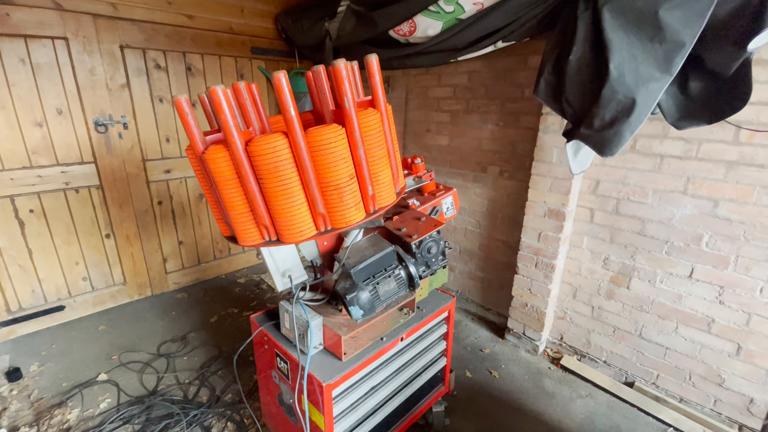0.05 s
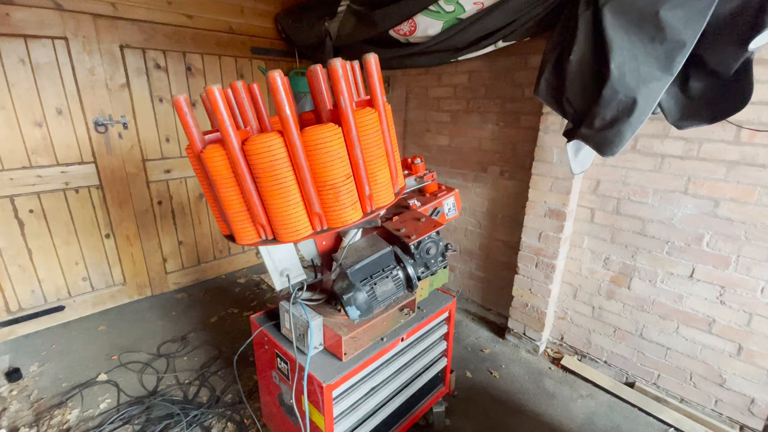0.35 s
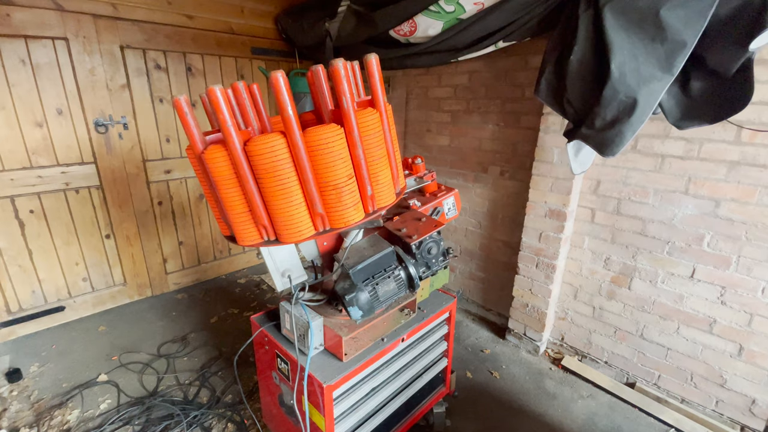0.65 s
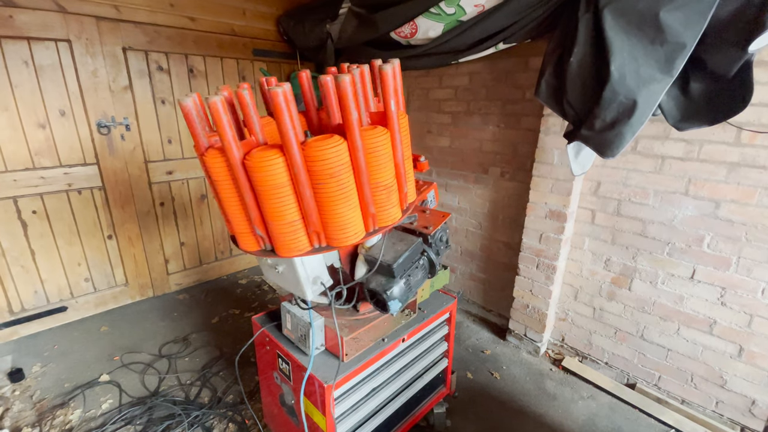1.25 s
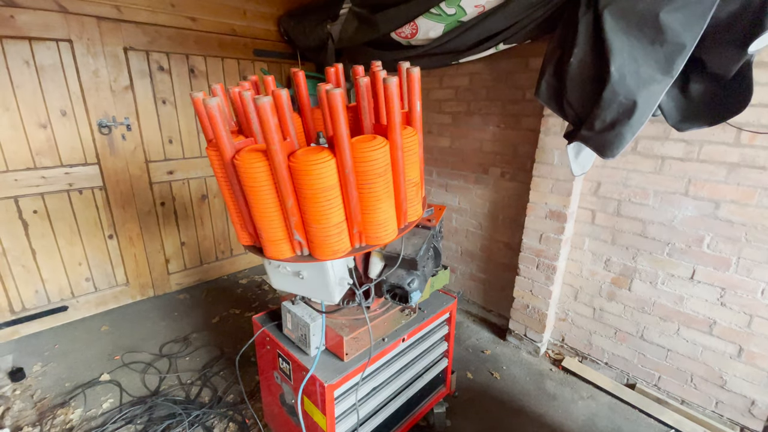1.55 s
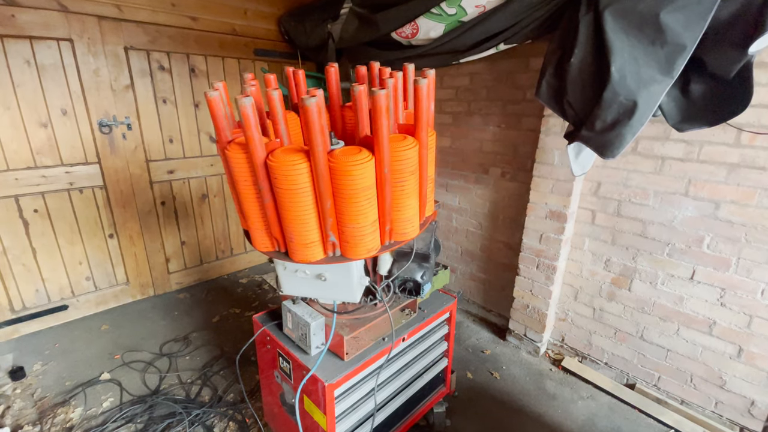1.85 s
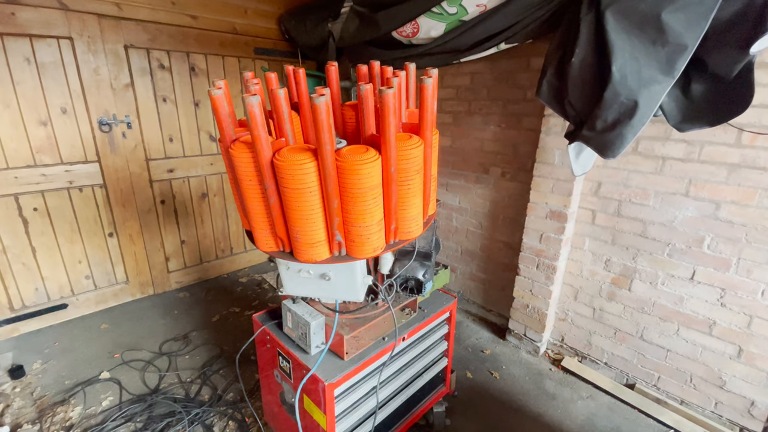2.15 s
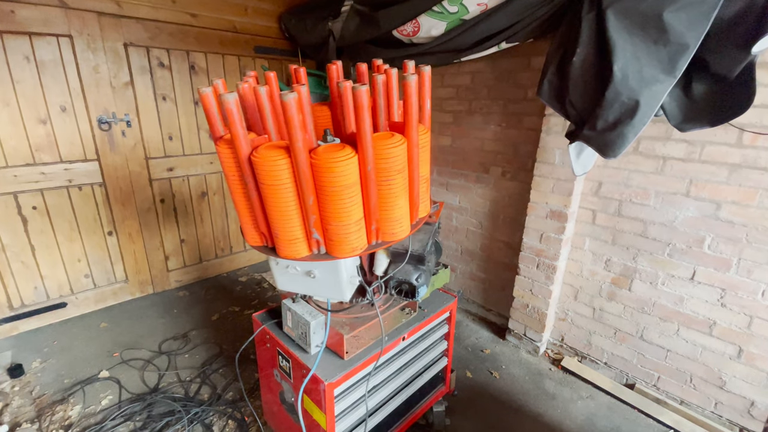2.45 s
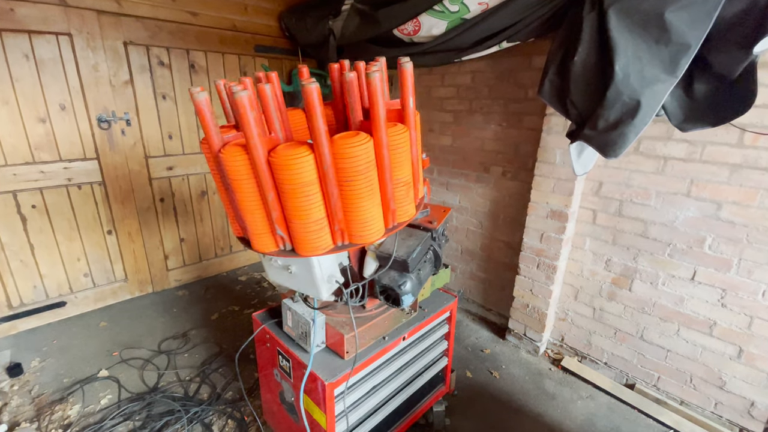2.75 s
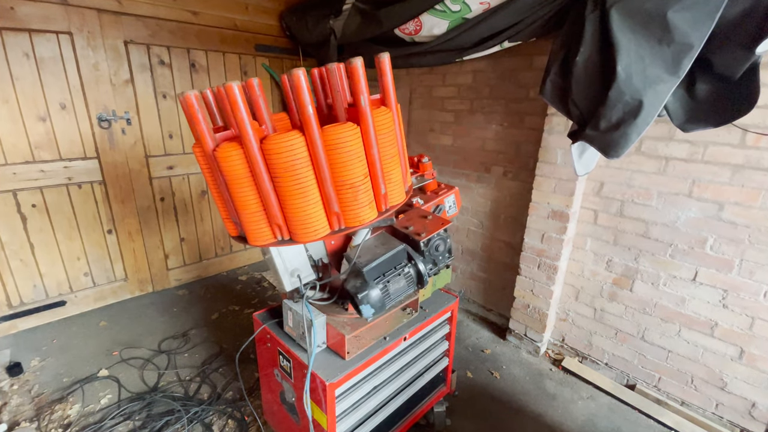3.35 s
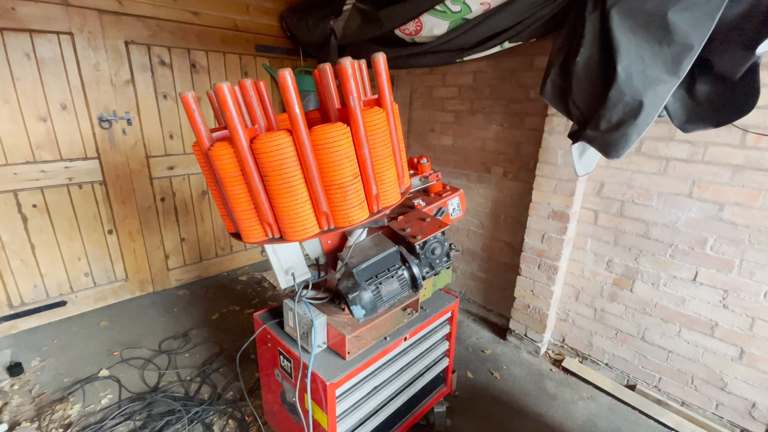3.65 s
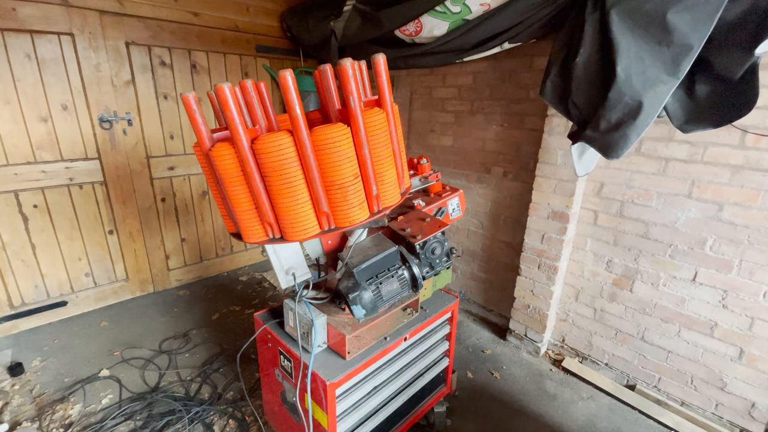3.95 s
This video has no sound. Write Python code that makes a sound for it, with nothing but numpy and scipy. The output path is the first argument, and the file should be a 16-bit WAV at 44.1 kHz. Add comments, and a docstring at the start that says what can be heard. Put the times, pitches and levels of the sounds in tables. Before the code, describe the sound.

A clay target machine starts with steel clatter at about 0.3 seconds, its motor humming and gears whirring, and gives its loudest clunk near 0.65. It whirrs more quietly, rubbing lightly around 2 seconds, then clatters and scrapes from 2.3 to 2.7. A faintly squeaky scrape follows after 3, with sharp clunks near 3.7 and 4. A low rumble lies underneath, and the small shed adds short echoes.

```python
"""Clay target machine in a shed

A clay target machine swivels and cycles in a small brick and timber shed, over a low rumble.
Its motor hums at twice the mains frequency over a whirr of gears. Sliding parts scrape, rub
and faintly squeak; the steel frame clunks and clatters as the drive takes up and reverses.
The shed's short echoes shift as the head swings out and back."""
import sys
import numpy as np
from scipy import signal
from scipy.fft import rfft, irfft
from scipy.io import wavfile

SR = 44100
rng = np.random.default_rng(int(sys.argv[2]) if len(sys.argv) > 2 else 0)


def unload_audio(sound):
    """Save the sound as a 16-bit wav file, at the path given as the first command line argument."""
    columns = np.transpose(np.atleast_2d(sound))
    # keep every value between -1 and 1, then stretch to whole-number steps
    steps = np.round(np.clip(columns, -1, 1) * 32767)
    wavfile.write(sys.argv[1], SR, steps.astype(np.int16))


N = 176400
TIME = np.arange(N) / SR

# tone of the background rumble: (frequency [Hz], relative level [dB])
RUMBLE_SPECTRUM = [(22, -74), (35, -20), (50, 5), (66, 18), (85, 8.5), (130, 3), (200, -46), (400, -92)]
# the shed's reverb tail: (frequency [Hz], time to fall 60 dB [s])
SHED_DECAY = [(150, 0.35), (1000, 0.26), (4000, 0.28), (11000, 0.15)]
# stereo tilt of the whole mix: (frequency [Hz], left minus right [dB])
LEFT_TILT = [(100, 0.5), (200, -6.5), (350, 3), (700, 2), (1200, 4.5), (2100, 1), (3800, 7), (6500, 6.5),
             (8500, 5.5), (11000, -2.5)]
# envelope of the motor hum: (time [s], level [dB])
HUM_ENVELOPE = [(0, -80), (.28, -51.5), (.39, -37.5), (.445, -26.5), (.6, -31.5), (.7, -31), (.79, -39),
                (.87, -31.5), (1.27, -32.5), (1.52, -39.5), (2.17, -39), (2.3, -29), (2.38, -41.5),
                (2.46, -28), (2.53, -27), (2.59, -39), (2.65, -30.5), (2.76, -30), (2.89, -38.5),
                (3.0, -29), (3.3, -32), (3.71, -31.5), (3.92, -28.5), (4, -34)]
# buzz of the motor housing: (harmonic of the hum [number], relative level [dB])
BUZZ_HARMONICS = [(2, -2.5), (3, -4.5), (5, -9), (6, -8.5), (7, -5), (8, -7.5), (9, -5), (10, -22),
                  (11, -2), (12, -15.5)]
# load on the drive: (time [s], buzz level [dB], gear whirr level [dB])
DRIVE_LOAD = [(0, -60.5, -50), (.22, -57, -50.5), (.4, -47.5, -38.5), (.8, -62.5, -41), (1.1, -51.5, -42),
              (1.6, -66, -42), (1.8, -49, -42), (2.2, -48.5, -43), (2.6, -49.5, -39), (2.9, -49, -39.5),
              (3.25, -42, -44), (3.6, -42.5, -41), (4, -56, -38)]
# tone of the gearbox: (frequency [Hz], relative level [dB])
GEAR_SPECTRUM = [(100, -4), (200, -4), (280, 1.5), (420, -7.5), (700, -4.5), (1050, -2.5), (1550, -12.5),
                 (2000, -13.5), (2900, -24), (4500, -31.5), (9000, -37), (13000, -67)]
# tone of the turntable's rub: (frequency [Hz], relative level [dB])
TURNTABLE_SPECTRUM = [(500, -3), (1500, -1.5), (2200, 3), (2850, 1.5), (4000, -16.5), (4900, -10),
                      (5700, -17.5), (9000, -19), (11500, -12.5), (12800, -59)]
# faint singing of sliding parts: (time [s], hold [s], pitch [Hz], level [dB])
SQUEAK_CUES = [(1.362, 0.084, 2000, -55), (1.792, 0.26, 2200, -54), (1.764, 0.61, 2750, -53.5),
               (2.376, 0.043, 1722, -40), (2.437, 0.023, 2061, -39.5), (2.434, 0.027, 3160, -46),
               (3.054, 0.38, 2420, -49), (3.065, 0.41, 2918, -52), (3.2, 0.06, 865, -48)]
# parts sliding on each other:
# (time of full pressure [s], rise [s], hold [s], fall [s], body level [dB], hiss level [dB])
SCRAPE_CUES = [(0.498, 0.017, 0.012, 0.015, -57, -47), (0.825, 0.0064, 0.024, 0.0078, -36.5, -48),
               (2.284, 0.014, 0.022, 0.022, -36, -49.5), (2.422, 0.065, 0.028, 0.035, -35.5, -42),
               (2.571, 0.0078, 0.021, 0.03, -36.5, -50), (2.685, 0.0057, 0.082, 0.018, -42.5, -50.5),
               (3.067, 0.057, 0.48, 0.023, -45, -47), (3.196, 0.088, 0.051, 0.067, -34.5, -49.5),
               (3.836, 0.0088, 0.013, 0.024, -45.5, -45.5)]
# midrange body of a scrape: (frequency [Hz], relative level [dB])
SCRAPE_BODY_SPECTRUM = [(200, -13), (320, 2), (500, -4.5), (800, 3.5), (1100, -1.5), (1500, -5.5),
                        (2000, -3), (2800, -21), (4000, -17.5), (8000, -60)]
# bright hiss of a scrape: (frequency [Hz], relative level [dB])
SCRAPE_HISS_SPECTRUM = [(1000, -14), (2000, 1.5), (2700, 13.5), (3800, 2), (4800, 7), (7500, 4.5),
                        (9200, 0.5), (11700, -7.5), (13300, -53)]
# blows on the frame: (time [s], thud [dB], clang [dB], tick [dB], pitch of the part struck [Hz])
KNOCK_CUES = [(0.2359, -40, -26.5, -34, 1266), (0.327, -33, -25, -44.5, 1160),
              (0.344, -25.5, -29, -45, 2070), (0.3544, -24.5, -19.5, -28.5, 1480),
              (0.372, -30, -30, -39, 1293), (.394, -35, -31, -47, 1610), (0.618, -43, -29.5, -65, 1232),
              (0.6238, -55, -71, -37.5, 1900), (.647, -22.5, -12.5, -29.5, 1147), (.66, -27, -24, -31, 990),
              (0.675, -30, -29, -28, 970), (0.693, -20.5, -42, -36, 870), (0.852, -42, -31, -82, 965),
              (0.9157, -62, -88, -37.5, 1900), (2.299, -31.5, -34, -38.5, 960), (2.325, -44, -37, -44, 899),
              (2.3492, -45, -30.5, -30, 960), (2.38, -35, -30, -30.5, 1780), (2.412, -33, -30, -39, 620),
              (2.434, -30, -29.5, -40, 1190), (2.458, -27.5, -33, -48, 299), (2.581, -42, -34, -62, 1065),
              (2.646, -51, -66, -34.5, 1900), (2.663, -34, -33, -40, 890), (2.707, -43, -62, -38, 1940),
              (3.6425, -45, -25, -48, 1180), (3.66, -25.5, -30, -50, 296),
              (3.6754, -29.5, -25.5, -30, 1430), (3.69, -19.5, -30.5, -39, 1750),
              (3.746, -30, -58, -72, 279), (3.969, -38, -15.5, -28, 1267), (3.981, -22, -24.5, -35, 930)]
# modes of the steel frame: (frequency [Hz], relative level [dB], time to fall 60 dB [s])
FRAME_MODES = [(293, 4, 0.067), (580, -3.5, 0.049), (674, -1.5, 0.054), (803, -1, 0.028),
               (866, -7.5, 0.076), (1113, 0.5, 0.038), (1343, -6, 0.036), (1407, -1.5, 0.039),
               (1871, -3.5, 0.056), (7340, -1, 0.039)]
# the dense, short-lived rest of the frame's ring: (frequency [Hz], relative level [dB])
CRACK_SPECTRUM = [(60, -26), (190, -3), (290, 11), (430, -4), (800, 4), (1300, -3), (1900, 0), (3000, -1.5),
                  (4000, -9.5), (7000, -9), (9500, -8.5), (11500, -11.5), (14000, -43)]

RUMBLE_DB, RUMBLE_FADE_DB_PER_S, RUMBLE_WIDTH = -45.5, .8, .3
SHED_BUILD_S, MONO_BELOW_HZ = .00044, 385
SWIVEL_START_S, SWIVEL_END_S = 1.0, 3.2
DRIVE_WET_DB, DRIVE_LEAD_S = 6.5, .00046
KNOCK_WET_DB, KNOCK_LEAD_S = .5, .00018
HUM_HZ, HUM_WOBBLE_HZ, HUM_FLUTTER_DB = 100.1, .478, 1.1
GEAR_GRAIN_DB, GEAR_FLUTTER_DB = 5, 1.5
RUB_START_S, RUB_END_S, RUB_RISE_S, RUB_FALL_S, RUB_DB = 1.75, 2.3, .059, .03, -49.5
SQUEAK_WIDTH_HZ, SQUEAK_RISE_S, SQUEAK_FALL_S = 80, .023, .0078
FINE_GRAIN_DB, COARSE_GRAIN_DB = 4, 5.5
THUD_HZ, CLANG_HZ, TICK_HZ, KNOCK_ATTACK_S = 261, 1060, 7560, .00034
RING_DB, RING_SPREAD_DB, RING_DETUNE, RING_BUILD_S = -1.5, 1.0, .016, .0018
CRACK_DB, CRACK_T60_S = 4.5, .05
SNAP_DB, SNAP_T60_S, SNAP_ABOVE_HZ = 6.5, .0074, 4200   # the bright instant of contact
PART_DB, PART_T60_S = 5.5, .034   # the ring of the part struck
LOW_CUT_HZ, HIGH_CUT_HZ = 42, 15700


def amp(db):
    """Decibels to gain."""
    return 10 ** (np.asarray(db) / 20)


def unit(x):
    """Scale to rms 1."""
    return x / np.sqrt(np.mean(x ** 2) + 1e-20)


def at_hz(points, hz):
    """Read a curve on a log-frequency axis."""
    freqs, values = np.transpose(points)
    return np.interp(np.log(np.maximum(hz, 1)), np.log(freqs), values)


def envelopes(rows):
    """One envelope for each level column of a timed table."""
    times, *columns = np.transpose(rows)
    return [np.interp(TIME, times, column) for column in columns]


def bins(n):
    """Frequencies of an n-point spectrum."""
    return np.arange(n // 2 + 1) * SR / n


def equalise(x, spectrum):
    """Apply an EQ curve."""
    n = x.shape[-1]
    return irfft(rfft(x) * amp(at_hz(spectrum, bins(n))), n)


def colour(x, spectrum):
    """EQ a steady signal and bring it to rms 1."""
    return unit(equalise(x, spectrum))


def drift(rate_hz):
    """Smooth random modulation, rms 1."""
    return unit(irfft(rfft(rng.standard_normal(N)) / (1 + (bins(N) / rate_hz) ** 2), N))


def grains(spread_db):
    """Grit: dense tiny contacts of uneven size."""
    size = amp(spread_db * np.minimum(rng.exponential(1, N), 5))
    return size * rng.choice([-1, 1], N) * (rng.random(N) < .1)


def stroke(time, rise, hold, fall):
    """Envelope that swells to full at the given time, holds and dies away."""
    early, late = np.maximum(time - TIME, 0), np.maximum(TIME - time - hold, 0)
    return np.exp(-(early / rise) ** 2 - late / fall)


def chatter(depth):
    """Tremolo of a contact shaken by the motor's hum."""
    return 1 + depth * np.sin(2 * np.pi * HUM_HZ * TIME)


def rumble():
    """A low bed of noise, nearly mono, slowly fading."""
    air = rng.standard_normal(N) + RUMBLE_WIDTH * rng.standard_normal((2, N))
    return amp(RUMBLE_DB - RUMBLE_FADE_DB_PER_S * TIME) * colour(air, RUMBLE_SPECTRUM)


def shed_response():
    """Diffuse echoes die band by band, near mono in the bass and wide above; unit energy."""
    n = SR // 2
    t, freqs, tail = TIME[:n], bins(n), 0
    mono, wide = rfft(rng.standard_normal(n)), rfft(rng.standard_normal((2, n)))
    mono_share = 1 / (1 + (freqs / MONO_BELOW_HZ) ** 2)
    field = np.sqrt(mono_share) * mono + np.sqrt(1 - mono_share) * wide
    centres = np.geomspace(100, 12800, 8)
    for hz, weights in zip(centres, np.eye(len(centres))):
        band = irfft(field * at_hz(np.c_[centres, weights], freqs), n)
        tail = tail + band * amp(-60 * t / at_hz(SHED_DECAY, hz))
    return unit(tail * (1 - np.exp(-t / SHED_BUILD_S))) / np.sqrt(n)


def shed_echoes(x, responses):
    """The head swings out and back, crossfading between two patterns of echoes."""
    swing = np.interp(TIME, [SWIVEL_START_S, SWIVEL_END_S], [0, np.pi])
    crossfade = np.pi / 2 * np.sin(swing) ** 2
    home, turned = (signal.fftconvolve(x[None], response, axes=1)[:, :N] for response in responses)
    return np.cos(crossfade) * home + np.sin(crossfade) * turned


def in_shed(x, responses, wet_db, lead_s):
    """Direct sound, reaching the left ear first, in an equal-power blend with the echoes."""
    direct = np.array([x, np.interp(TIME - lead_s, TIME, x)])
    return (direct + amp(wet_db) * shed_echoes(x, responses)) / np.sqrt(1 + amp(wet_db) ** 2)


def motor(buzz_db):
    """Magnetic hum under the flickering overtones of the housing."""
    phase = 2 * np.pi * np.cumsum(HUM_HZ + HUM_WOBBLE_HZ * drift(5.56)) / SR
    phase = phase - np.array([[0], [2 * np.pi * HUM_HZ * DRIVE_LEAD_S]])   # the right ear lags
    hum_db, = envelopes(HUM_ENVELOPE)
    out = amp(hum_db + HUM_FLUTTER_DB * drift(6.4)) * np.sin(phase)
    for harmonic, db in BUZZ_HARMONICS:
        start_phase = rng.uniform(0, 2 * np.pi)
        gain = amp(buzz_db + db + 1.8 * drift(14))
        out = out + gain * np.sin(harmonic * phase + start_phase + .11 * drift(4.7))
    return np.sqrt(2) * out


def gears(whirr_db):
    """Teeth and bearings patter into the gearbox and blur to a whirr."""
    return amp(whirr_db + GEAR_FLUTTER_DB * drift(42)) * colour(grains(GEAR_GRAIN_DB), GEAR_SPECTRUM)


def turntable():
    """The turntable rubs lightly on its way round, chattering with the hum."""
    grit = grains(FINE_GRAIN_DB) * chatter(depth=.31)
    pressure = stroke(RUB_START_S, RUB_RISE_S, RUB_END_S - RUB_START_S, RUB_FALL_S)
    return amp(RUB_DB) * pressure * colour(grit, TURNTABLE_SPECTRUM)


def squeaks():
    """Friction keeps single resonances singing unsteadily."""
    out = 0
    for time, hold, hz, db in SQUEAK_CUES:
        phase = 2 * np.pi * hz * TIME
        tone = drift(SQUEAK_WIDTH_HZ) * np.sin(phase) + drift(SQUEAK_WIDTH_HZ) * np.cos(phase)
        out = out + amp(db) * stroke(time, SQUEAK_RISE_S, hold, SQUEAK_FALL_S) * tone
    return out


def scrapes():
    """Sliding contacts: a coarse body shaken by the hum, with a finer hiss on top."""
    body_gain = sum(amp(db) * stroke(*timing) for *timing, db, _ in SCRAPE_CUES)
    hiss_gain = sum(amp(db) * stroke(*timing) for *timing, _, db in SCRAPE_CUES)
    body = colour(grains(COARSE_GRAIN_DB) * chatter(depth=.15), SCRAPE_BODY_SPECTRUM)
    hiss = colour(grains(FINE_GRAIN_DB), SCRAPE_HISS_SPECTRUM)
    return body_gain * body + hiss_gain * hiss


def frame_ring(t, contact_eq):
    """The steel frame's modes ring out, tuned and balanced a little differently by each blow."""
    hz, db, t60 = np.transpose(FRAME_MODES)
    detune, uneven = rng.standard_normal((2, len(hz)))
    decay = amp(-60 * t / t60[:, None])
    modes = decay * np.sin(2 * np.pi * np.outer(hz * (1 + RING_DETUNE * detune), t))
    strength = amp(RING_DB + db + at_hz(contact_eq, hz) + RING_SPREAD_DB * uneven)
    return (strength * rng.choice([-1, 1], len(hz))) @ modes


def knocks():
    """Each blow snaps, cracks and rings the part struck and the frame; its contact sets the tone."""
    n = SR // 3
    t, out = TIME[:n], np.zeros(N + SR)
    snap_band = signal.butter(3, [SNAP_ABOVE_HZ, 2 * SNAP_ABOVE_HZ], "band", fs=SR, output="sos")
    attack, bloom = 1 - np.exp(-t / KNOCK_ATTACK_S), 1 - np.exp(-t / RING_BUILD_S)
    for time, thud_db, clang_db, tick_db, part_hz in KNOCK_CUES:
        contact_eq = [(THUD_HZ, thud_db), (CLANG_HZ, clang_db), (TICK_HZ, tick_db)]
        ring = frame_ring(t, contact_eq)
        crack = equalise(colour(rng.standard_normal(n), CRACK_SPECTRUM), contact_eq)
        crack *= amp(CRACK_DB - 60 * t / CRACK_T60_S)
        snap = unit(signal.sosfilt(snap_band, rng.standard_normal(n)))
        snap *= amp(tick_db + SNAP_DB - 60 * t / SNAP_T60_S)
        part = np.sin(2 * np.pi * part_hz * t)
        part *= amp(PART_DB + at_hz(contact_eq, part_hz) - 60 * t / PART_T60_S)
        start = int(time * SR)
        out[start:start + n] += (snap + crack + (part + ring) * bloom) * attack
    return out[:N]


def scene():
    """The stereo mix: the machine stands a little to the left in the shed."""
    buzz_db, whirr_db = envelopes(DRIVE_LOAD)
    shed = shed_response(), shed_response()   # head at home, head turned
    drive = gears(whirr_db) + scrapes() + turntable() + squeaks()
    mix = in_shed(drive, shed, DRIVE_WET_DB, DRIVE_LEAD_S) + motor(buzz_db) + rumble()
    mix += in_shed(knocks(), shed, KNOCK_WET_DB, KNOCK_LEAD_S)
    tilt_db = at_hz(LEFT_TILT, bins(2 * N)) * np.array([[.5], [-.5]])
    return irfft(rfft(mix, 2 * N) * amp(tilt_db))[:, :N]


def record(dry):
    """The microphone drops the deepest bass; the top is cut steeply."""
    low_cut = signal.butter(3, LOW_CUT_HZ, "high", fs=SR, output="sos")
    high_cut = signal.ellip(10, .2, 80, HIGH_CUT_HZ, fs=SR, output="sos")
    return signal.sosfilt(high_cut, signal.sosfilt(low_cut, dry))


dry = scene()
out = record(dry)
unload_audio(out)
```